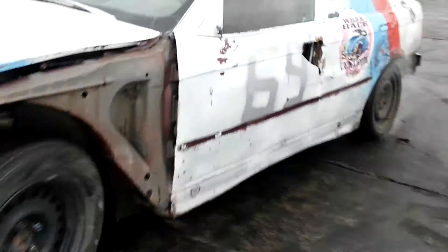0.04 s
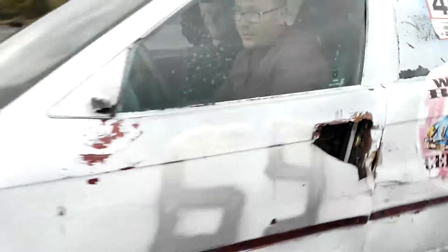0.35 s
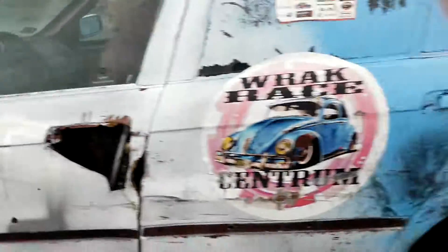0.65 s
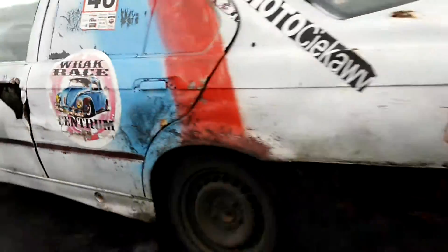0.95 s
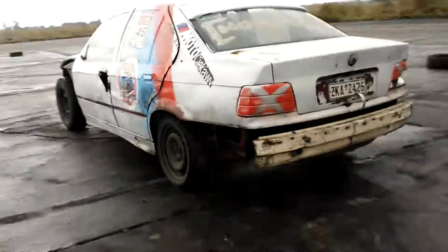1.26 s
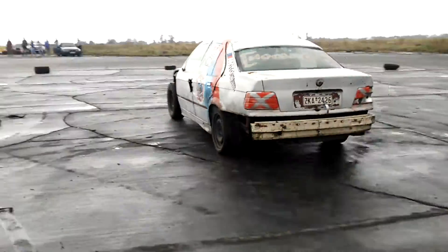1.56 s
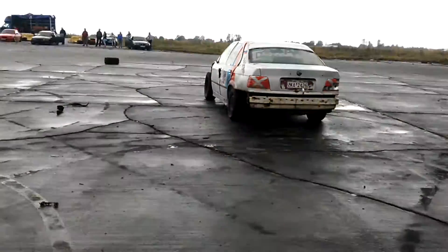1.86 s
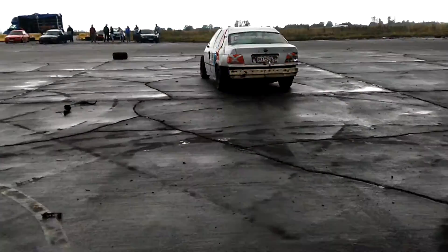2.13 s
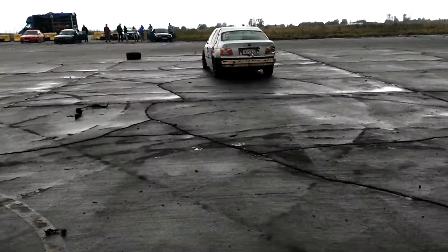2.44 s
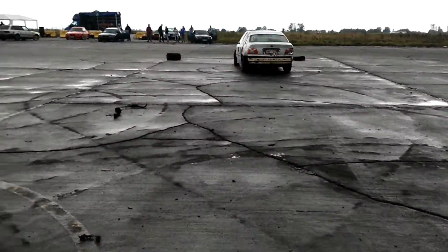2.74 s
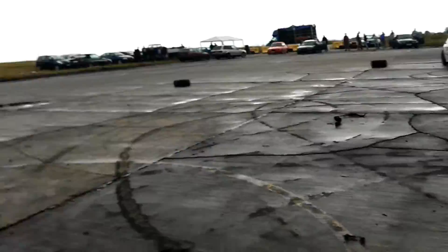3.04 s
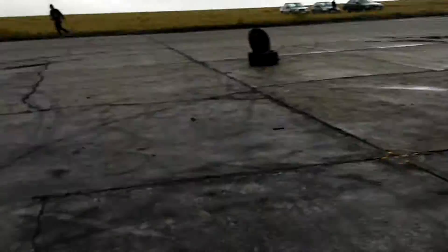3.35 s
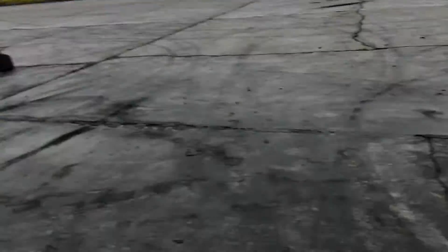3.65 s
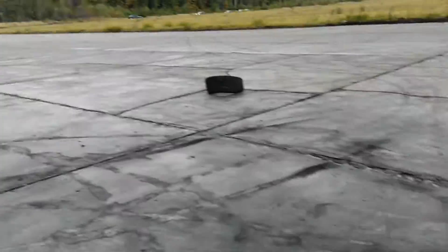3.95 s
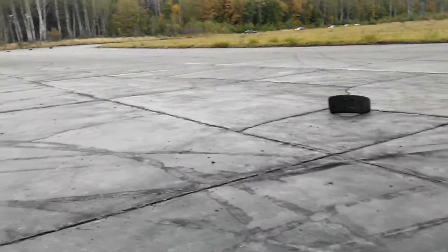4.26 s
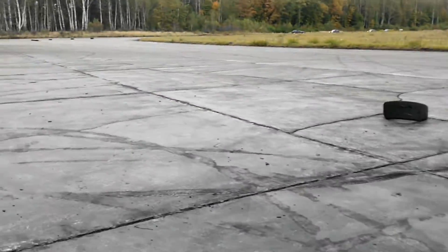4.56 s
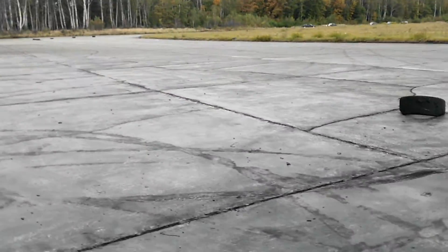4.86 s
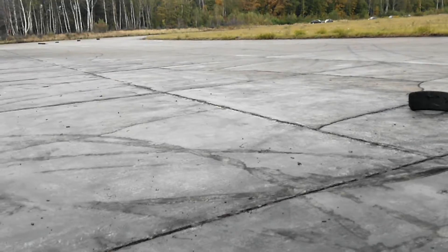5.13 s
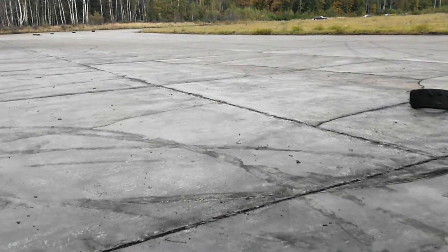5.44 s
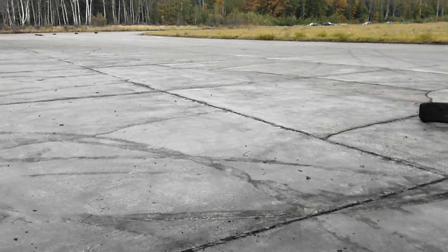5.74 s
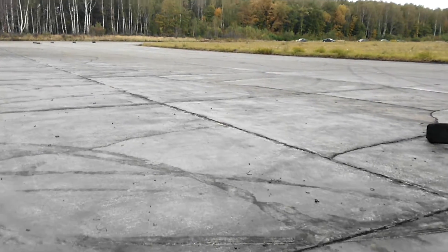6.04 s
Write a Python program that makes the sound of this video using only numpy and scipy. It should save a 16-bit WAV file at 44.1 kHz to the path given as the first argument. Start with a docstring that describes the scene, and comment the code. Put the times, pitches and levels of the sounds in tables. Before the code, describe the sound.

A rough engine booms and revs as a car pulls away outdoors, growing distant while its tyres scrub and squeal.

```python
"""A battered six-cylinder saloon pulls away beside a handheld camera and drifts off over damp concrete.
Its open exhaust booms and rasps with the throttle as unequal firings ring the silencer and tailpipe.
The tyres scrub and squeal by stick-slip, slab joints thud the body; a low moan and thin squeaks join in.
Far off, more of the car arrives as echo. Close up, the camera's limiter holds it down and buzzes faintly."""
import sys
import numpy as np
from scipy import signal
from scipy.fft import rfft, irfft, next_fast_len
from scipy.io import wavfile
from scipy.ndimage import uniform_filter1d, map_coordinates

SR = 44100
rng = np.random.default_rng(int(sys.argv[2]) if len(sys.argv) > 2 else 0)


def master_out(mix):
    """Clip the mix to full scale and print it as 16-bit PCM to the path in sys.argv[1]."""
    frames = np.transpose(np.atleast_2d(mix))
    ceiling = np.clip(frames, -1, 1)
    pcm = np.round(ceiling * 32767).astype(np.int16)
    wavfile.write(sys.argv[1], SR, pcm)


N = 273414
T = np.arange(N) / SR


def amp(db):
    """Decibels to gain."""
    return 10 ** (np.asarray(db) / 20)


def unit(x):
    """Scale to rms 1."""
    return x / np.sqrt(np.mean(x ** 2) + 1e-18)


def curves(table):
    """Table columns, interpolated linearly in time."""
    times, *columns = np.transpose(table)
    return [np.interp(T, times, column) for column in columns]


def swell(at_s, width_s):
    """Gaussian rise and fall."""
    return np.exp(-((T - at_s) / width_s) ** 2)


def colour(x, points):
    """Minimum-phase filter through (f/Hz, gain/dB) points; -10 dB/octave above the last."""
    hz, db = np.transpose(points)
    size = next_fast_len(N + 8192, True) // 2 * 2
    octave = np.log2(np.arange(size // 2 + 1) * SR / size + 1)
    gain_db = np.interp(octave, np.log2(hz), db) - 10 * np.maximum(octave - np.log2(hz[-1]), 0)
    cepstrum = irfft(np.log(amp(gain_db)))
    cepstrum[1:size // 2] *= 2
    cepstrum[size // 2 + 1:] = 0
    return irfft(rfft(x, size) * np.exp(rfft(cepstrum)))[..., :N]


def noise(points, channels=1):
    """Coloured noise, rms 1."""
    return unit(colour(rng.standard_normal((channels, N)), points))


def walk(rate_hz):
    """Smooth random drift, rms 1."""
    knots, coarse = rng.standard_normal(16384), T[::16]
    drift = map_coordinates(knots, [coarse * rate_hz + 2], order=2, mode="wrap")
    return np.interp(T, coarse, unit(drift))


def pulses(at, sizes, points):
    """Coloured impulses at fractional sample positions, rms 1."""
    i = np.clip(at.astype(int), 0, N - 2)
    train = np.bincount(i, sizes * (1 - at + i), N) + np.bincount(i + 1, sizes * (at - i), N)
    return unit(colour(train, points))


def place(x, lead_ms, pan_db):
    """Two microphone ports; positive values make the left earlier and louder."""
    x, shift = np.ravel(x), lead_ms * SR / 1000 / 2
    return np.array([amp(side * pan_db / 2) * map_coordinates(x, [np.arange(N) + side * shift], order=2)
                     for side in (1, -1)])


# loudness against the car alongside: t/s, level/dB
PRESENCE = [(0, -1), (2.05, -7), (2.13, -9.5), (2.23, -18), (2.46, -27.5), (2.7, -27), (3.02, -37),
            (3.28, -24.5), (3.6, -27.5), (4.02, -31), (4.3, -27.5), (4.55, -28.5), (4.85, -20.5),
            (5.1, -16.5), (5.4, -20), (5.8, -22), (6.04, -35.5), (6.14, -33), (6.2, -35)]
# pedal: t/s, opening/0-1
THROTTLE = [(0, 0.97), (.3, 0.91), (.43, 0.67), (.54, 0.48), (.62, 0.54), (.69, 0.51), (0.791, 0.17),
            (1.001, 0.04), (1.1, 0.48), (1.2, 0.95), (1.35, 1), (1.75, 0.92), (2.149, 0.76), (4.4, 0.86),
            (5.1, 0.88), (5.7, 1)]
# rough running: t/s, scatter/share of firing size
UNEVEN = [(0, 0.3), (.25, .58), (.66, 0.56), (.78, 0.072), (1.199, 0.13), (1.69, 0.12), (1.87, 0.58),
          (2.35, 0.62), (3.001, 0.13), (3.801, .36), (4.299, 0.46), (4.7, .48), (5.152, .15), (6.2, 0.18)]
# beam of the tail, swinging towards the microphone and away: t/s, gain/dB
AIM = [(0, 5.5), (2.1, 2.5), (2.42, 1.5), (2.85, 5.5), (3.2, 4.5), (3.8, 2), (4.2, -0.5), (4.65, -8.5),
       (5.1, -16), (6.2, -17)]

def car_gain(db, presence, throttle_db, uneven_db=0, aim=0):
    """Layer gain: base level plus weighted presence, throttle, rough running and tail beam."""
    for table, weight in (PRESENCE, presence), (THROTTLE, throttle_db), (UNEVEN, uneven_db), (AIM, aim):
        db = db + weight * curves(table)[0]
    return amp(db)


# engine orders: f/firing rate
ORDERS = [1, 1.5, 2, 3, 4, 5]
# per order: base/dB, full-throttle lift/dB, fully uneven lift/dB, presence weight, aim weight
ORDER_LEVELS = [(-0.5, -4, 1.5, 1.16, -.1), (-44, 8, 40.5, 0.77, .1), (-34, 35, 3, 1.18, -0.17),
                (-27, 10.5, 3, 0.86, .04), (-27, 8, 3.5, 1.045, 0), (-43, 3, 2, 0.59, .6)]
# pipe resonances: f/Hz, half width/Hz, lift/dB
PIPE_PEAKS = [(372.8, 28, 7), (475, 20, 8), (555.3, 17, 6.5)]

def boom(firing_hz, cycles, presence_db):
    """Low exhaust orders swell at the pipe's resonances and waver more with distance."""
    fading_db = .5 - presence_db / 11
    out = 0
    for order, (db, throttle_db, uneven_db, presence, aim) in zip(ORDERS, ORDER_LEVELS):
        pipe_db = sum(lift_db * np.exp(-((order * firing_hz - hz) / width_hz) ** 2)
                      for hz, width_hz, lift_db in PIPE_PEAKS)
        gain = car_gain(db + pipe_db + fading_db * walk(22), presence, throttle_db, uneven_db, aim)
        dispersion_rad = np.pi / 2 * (order - 1) ** 2  # keeps the crests even
        out += gain * np.cos(2 * np.pi * order * cycles + dispersion_rad)
    return out


# tick spectrum: f/Hz, gain/dB
TICK = [(500, -19), (930, 9), (1150, 2.5), (1700, 3), (2500, -8), (3400, -24.5), (4500, -31)]

def overload_ticks(at, sizes):
    """Crisp overload ticks in step with the firings while the engine is close."""
    return pulses(at, sizes, TICK) * car_gain(-43, presence=1.35, throttle_db=8.5, uneven_db=-19.5, aim=1.2)


# firing rate (blips, climb, held drift, sinking revs): t/s, f/Hz
FIRING = [(0, 99.2), (.1, 90), (.22, 83.2), (.3, 86.5), (.47, 107.5), (.62, 88.5), (.78, 108.3),
          (.86, 113.3), (1.02, 105.5), (1.23, 122.3), (1.35, 117.4), (1.5, 130.3), (1.69, 128.2),
          (1.85, 140), (2.3, 141.3), (2.75, 141), (3.02, 135.5), (3.9, 134.5), (4.25, 125), (4.85, 121.3),
          (5.39, 105), (5.73, 87.4), (6.2, 62.7)]
# cylinder imbalance, in firing order: surplus/share
CYLINDERS = [0.56, -0.8, -0.0057, -0, 0.9, -0.6]
# spectra of silencer, tailpipe and escaping gas: f/Hz, gain/dB
SILENCER = [(35, -24.5), (65, -5), (120, -5.5), (190, 0.5), (290, 7.5), (380, 0), (430, 0), (560, -26.5),
            (1200, -69.5)]
TAILPIPE = [(250, -25), (400, -28.5), (450, -0.5), (485, -4), (540, -1.5), (590, -20), (660, -30),
            (850, -40.5), (1500, -67.5)]
RASP = [(350, -48.5), (520, 2.5), (620, 9.5), (760, 11.5), (900, 8), (1020, 0.5), (1300, -4.5), (1600, -19),
        (2200, -41), (3000, -45.5), (4200, -46.5), (8000, -50.5)]
# engine takes up load: t/s, half width/s, lift/dB
BARKS = [(.43, .075, 6.5), (0.619, 0.034, 4.5), (1.188, .05, 2.5), (1.97, .13, 4)]

def exhaust():
    """Unequal firings ring the silencer and tailpipe; sharp fronts and gas puffs rasp over the boom."""
    firing_hz, scatter, presence_db = (curves(table)[0] for table in (FIRING, UNEVEN, PRESENCE))
    cycles = np.cumsum(firing_hz * (1 + .0037 * walk(40))) / SR
    low_orders = boom(firing_hz, cycles, presence_db)
    firings = np.arange(1, int(cycles[-1]))
    at = np.interp(firings, cycles, np.arange(N))
    spread = scatter[at.astype(int)]
    burble_jitter, howl_jitter, front_jitter = rng.standard_normal((len(firings), 3)).T * spread
    # repeats every six firings, filling in lines between the orders
    surplus = np.array(CYLINDERS)[firings % len(CYLINDERS)]
    burble = pulses(at, surplus + burble_jitter, SILENCER)
    howl = pulses(at, surplus + howl_jitter, TAILPIPE)
    fronts = pulses(at, 1 + .41 * surplus * spread + front_jitter, RASP)
    puffs = (.12 + np.exp(-(cycles % 1) / .25)) * amp(2.5 * walk(70))
    gas = unit(colour(puffs * rng.standard_normal(N), RASP))
    # rough running and distance smear the fronts into gas noise
    gas_share = np.clip(scatter - presence_db / 45, .05, .9)
    rasp = np.sqrt(1 - gas_share) * fronts + np.sqrt(gas_share) * gas
    bark = amp(sum(db * swell(at_s, width_s) for at_s, width_s, db in BARKS))
    return (low_orders + overload_ticks(at, 1 + front_jitter)
            + burble * car_gain(-40, presence=.41, throttle_db=15, uneven_db=10.5, aim=-.2)
            + bark * howl * car_gain(-45.5, presence=.4, throttle_db=12, uneven_db=17.5, aim=.86)
            + bark * rasp * car_gain(-35, presence=1.053, throttle_db=13, uneven_db=-6, aim=.85))


# noise spectra: f/Hz, gain/dB
RUMBLE = [(20, -13.5), (40, -11), (65, 2.5), (110, -2), (200, -10), (400, -5.5), (600, -11.5), (1200, -50)]
SCRUB = [(500, -23), (900, 5.5), (1400, 6), (2000, -0.5), (2600, -10.5), (3200, -21), (4500, -28),
         (8000, -40.5)]
CRACKLE = [(1500, -16.5), (3000, -1), (4500, -11), (6500, -2.5), (8300, -4.5), (11000, -3), (15000, -7)]
# gusts of rumble: t/s, half width/s, lift/dB
GUSTS = [(.05, .12, 13.5), (2.745, 0.27, 3), (3.476, 0.92, 5.5), (5.92, .05, 7.5)]
# flares: t/s, half width/s, wheelspin scrub lift/dB, crackle lift/dB
FLARES = [(0.43, 0.056, 1.5, 3.5), (.66, 0.13, 1.5, 2.5), (1.35, .2, 8.5, 0), (2.53, 0.11, 11, 8.5),
          (3.096, 0.041, 9, 9), (3.507, 0.044, -2, 4.5), (3.6, 0.096, 9, 0), (3.89, 0.22, 11.5, 0.5),
          (4.288, 0.075, 8, -1), (4.634, .025, 6, 16), (6.153, 0.2, 5, 17)]

def road_and_crackle(lead_ms, grains=6000):
    """Low rumble, rubber scrubbing concrete; a fine high crackle, strongest with the car close and loud."""
    gust_db = sum(db * swell(at_s, width_s) for at_s, width_s, db in GUSTS)
    scrub_db = sum(db * swell(at_s, width_s) for at_s, width_s, db, _ in FLARES)
    crackle_db = sum(db * swell(at_s, width_s) for at_s, width_s, _, db in FLARES)
    rumble = place(noise(RUMBLE), lead_ms, pan_db=0) + amp(-18.5) * noise(RUMBLE, channels=2)
    scrub = place(noise(SCRUB), lead_ms, pan_db=3.1) + amp(4) * noise(SCRUB, channels=2)
    at = rng.uniform(0, N - 2, grains)
    sizes = rng.standard_normal(grains) * rng.exponential(size=grains) ** .5
    crackle = place(pulses(at, sizes, CRACKLE), lead_ms=.052, pan_db=3.5)
    crackle += amp(-1) * noise(CRACKLE, channels=2)
    rumble *= car_gain(gust_db - 34.5, presence=.64, throttle_db=8.5, aim=.58)
    scrub *= car_gain(scrub_db - 57 + 1.8 * walk(22), presence=.74, throttle_db=12.5, aim=.37)
    crackle *= car_gain(crackle_db - 62.5 + 2.5 * walk(84), presence=.82, throttle_db=5.5, aim=.71)
    return rumble + scrub + crackle


# outdoor background spectrum: f/Hz, gain/dB
AIR = [(20, -6.5), (40, 2), (80, -11.5), (300, -26.5), (480, -1.5), (640, -24), (1200, -15.5), (2500, -36),
       (4500, -52.5), (8000, -55), (15000, -54)]

def air(level_db=-52):
    """Steady, dull background noise."""
    return amp(level_db) * noise(AIR, channels=2)


def ground_echo(x, t60_s=1.0, onset_s=.024):
    """Diffuse echo from open ground and tree line, unrelated at the two ports."""
    t = T[:SR]
    envelope = amp(-60 * t / t60_s) * np.minimum(t / onset_s, 1)
    tail = unit(rng.standard_normal((2, SR)) * envelope) / np.sqrt(SR)
    return signal.fftconvolve(x[None], tail, axes=1)[:, :N]


def squeal(track, modes, waver, flutter_db, bites=(), bite_width_s=.018, sag_per_db=.0035):
    """Stick-slip tone: each mode wavers in pitch and strength; bites are louder and lower."""
    hz, db = curves(track)
    lift_db = sum(lift * swell(at_s, bite_width_s) for at_s, lift in bites)
    hz = hz * (1 - sag_per_db * lift_db)
    start_s, end_s = track[0][0], track[-1][0] + .099
    gate = np.clip(np.minimum(T - start_s, end_s - T) / .063, 0, 1)
    tone = 0
    for multiple, mode_db in modes:
        mode_hz = multiple * hz * (1 + waver * walk(420))
        tone += amp(mode_db + flutter_db * walk(110)) * np.sin(2 * np.pi * np.cumsum(mode_hz) / SR)
    return unit(tone) * amp(db + lift_db) * gate


# tyre squeals: t/s, f/Hz, relative level/dB
LAUNCH = [(1.72, 1083, -32.5), (1.91, 1137, -26.5), (2.09, 1152, -39.5), (2.15, 1086, -54.5)]
TURN = [(2.5, 1230, -59), (2.8, 1170, -54.5), (3.05, 1200, -56.5), (3.45, 1110, -59), (3.62, 1120, -49.5),
        (3.81, 1340, -54.5), (3.9, 1200, -63), (4.05, 1130, -57.5)]
SLIDE = [(4.75, 1730, -85.5), (4.95, 1716, -69), (5.22, 1754, -56), (5.39, 1698, -58), (5.48, 1713, -52.5),
         (6.2, 1672, -54.5)]
# tread modes: f/squeal pitch, level/dB
TREAD_MODES = [(1, 5.5), (1.1, -6), (1.5, -20.5), (2, -28), (3, -30)]
SLIDE_MODES = [(.55, -15.5), (.73, -12), (.955, -0.5), (1, 4), (1.044, -9.5), (1.099, -12), (1.45, -15),
               (2, -23)]
# tread bites, squeal flares: t/s, lift/dB
BITES = [(2.638, 13.5), (2.714, 14.5), (2.832, 16.5), (3.075, 4), (3.15, 6.5), (3.267, 12), (3.537, 5.5),
         (3.648, 5.5), (3.826, 3), (4.912, 13)]

def tyres(lead_ms):
    """Tread sticks and slips in launch, turn and long slide; returns direct sound and echo feed."""
    launch = squeal(LAUNCH, TREAD_MODES, waver=.085, flutter_db=1)
    turn = squeal(TURN, TREAD_MODES, waver=.034, flutter_db=4, bites=BITES)
    slide = squeal(SLIDE, SLIDE_MODES, waver=.036, flutter_db=4, bites=BITES)
    direct = (amp(-.6) * place(launch, lead_ms=.12, pan_db=2.3)
              + amp(5.5) * place(turn, lead_ms, pan_db=8.5)
              + amp(1.5) * place(slide, lead_ms=.14, pan_db=12))
    return direct, amp(-2.5) * (turn + slide)


# low moan: t/s, nominal f/Hz, level/dB
MOAN = [(2.17, 520, -40.5), (2.35, 490, -22.5), (2.562, 480, -24), (2.75, 464, -35.5), (3.0, 465, -42)]

def moan():
    """One low ringing tone that sinks as the car draws away."""
    return squeal(MOAN, modes=[(.96, 0)], waver=.033, flutter_db=4.5)


# blows from slab joints: t/s, relative level/dB, knock against thud/dB
JOINTS = [(2.287, -19, -36.5), (2.331, -19, -40.5), (2.374, -28.5, -33), (2.423, -22.5, -25.5),
          (2.536, -27.5, -21), (3.236, -26, -66), (4.107, -23.5, -33.5), (4.145, -25.5, -47),
          (4.236, -19, -37.5), (4.265, -26, -15), (4.288, -24, -10), (4.342, -22, -17), (4.425, -17, -23.5),
          (4.574, -30.5, -38), (4.627, -31.5, -18), (4.661, -20.5, -28.5), (4.707, -35.5, -59.5),
          (6.107, -32.5, -55)]
# body and panel spectra: f/Hz, gain/dB
THUD = [(40, -24.5), (80, 18), (150, 13.5), (300, 16.5), (400, -6), (510, 13), (640, -15), (900, -45.5)]
KNOCK = [(500, -20.5), (800, 17), (1200, 15.5), (1700, -18), (3000, -47), (6000, -47)]

def thuds(attack_s=.0014, thud_decay_s=.03, knock_decay_s=.0043):
    """Each blow shakes the body: a dull burst and a shorter knock of loose panels."""
    body, panels = np.zeros(N), np.zeros(N)
    for at_s, db, knock_db in JOINTS:
        age_s = np.maximum(T - at_s, 0)
        blow = amp(db) * np.minimum(age_s / attack_s, 1)
        body += blow * np.exp(-age_s / thud_decay_s)
        panels += blow * amp(knock_db) * np.exp(-age_s / knock_decay_s)
    return amp(1.5) * body * noise(THUD)[0] + amp(9) * panels * noise(KNOCK)[0]


# thin squeaks: t/s, length/s, start f/Hz, end f/Hz, relative tone level/dB, hiss level/dB
SQUEAKS = [(2.382, 0.025, 4680, 4240, -68, -71), (2.53, 0.037, 5170, 4870, -63, -71),
           (2.625, 0.072, 5250, 4970, -71, -66.5), (2.722, .065, 5460, 4440, -54, -58),
           (2.818, 0.022, 5300, 4570, -63, -61), (2.838, 0.018, 5160, 3850, -51.5, -77),
           (2.848, 0.05, 5150, 4800, -62, -89), (2.953, 0.034, 5200, 4410, -70, -72.5)]
# hiss spectrum: f/Hz, gain/dB
SQUEAK_HISS = [(2200, 0.5), (3000, 10), (3700, 11), (4200, 8.5), (4800, 6.5), (5400, -15), (6500, -34.5)]

def squeaks(hiss_decay_s=.032, hiss_lead_s=.018):
    """Short, rough, falling squeaks, each in a burst of hiss that dies away."""
    out = np.zeros(N)
    hiss = noise(SQUEAK_HISS)[0]
    waver = 1 + .014 * walk(900)
    for at_s, length_s, start_hz, end_hz, tone_db, hiss_db in SQUEAKS:
        progress = np.clip((T - at_s) / length_s, 0, 1)
        hz = (start_hz + (end_hz - start_hz) * progress) * waver
        tone = np.sin(2 * np.pi * np.cumsum(hz) / SR)
        out += amp(tone_db + 2) * np.sin(np.pi * progress ** .5) * tone
        age = np.maximum(T - at_s + hiss_lead_s, 0) / hiss_decay_s
        out += amp(hiss_db) * age * np.exp(1 - age) * hiss
    return out


# car position: t/s, left lead/ms, left minus right/dB, echo/dB
BEARING = [(0, .17, 0, -30), (1.5, .15, .3, -28), (2.2, .08, 2.4, -17), (2.7, -.18, 3, -11),
           (3.2, .38, -.3, -11), (3.7, .47, 1.3, -12), (4.3, .33, 1.3, -13), (5.2, .15, 1.3, -16),
           (6.2, .14, 1.4, -15)]

def scene():
    """The car moves off; the further it is, the more of it arrives as echo."""
    lead_ms, pan_db, echo_db = curves(BEARING)
    car = (moan() + exhaust() + thuds()) * np.minimum(T / .004, 1)
    squeals, squeal_feed = tyres(lead_ms)
    echo = ground_echo(car * amp(echo_db) + squeal_feed)
    return (place(car, lead_ms, pan_db) + squeals + echo + road_and_crackle(lead_ms)
            + place(squeaks(), lead_ms=.029, pan_db=15) + air())


def record(dry, ceiling_db=-7.5, knee=.48, headroom=.27, step_hz=6000, top_hz=15400):
    """A fast limiter holds the level, rounds crests and buzzes on them as its gain steps; then a low-pass."""
    power = np.mean(dry ** 2, axis=0)
    power = uniform_filter1d(uniform_filter1d(power, size=900), size=700)
    held = dry * np.minimum(1, amp(ceiling_db) / np.sqrt(np.abs(power) + 1e-12))
    over = held - np.clip(held, -knee, knee)
    rounded = held - over + headroom * np.tanh(over / headroom)
    crests = np.tanh((held - np.clip(held, -.45, .45)) / .069)
    step_rad = 2 * np.pi * step_hz * T
    buzz = amp(-51) * crests * (np.sin(step_rad) + amp(-5) * np.sin(2 * step_rad))
    lowpass = signal.ellip(8, .2, 70, top_hz, fs=SR, output="sos")
    return signal.sosfilt(lowpass, rounded + buzz)


dry = scene()
out = record(dry)
master_out(out)
```